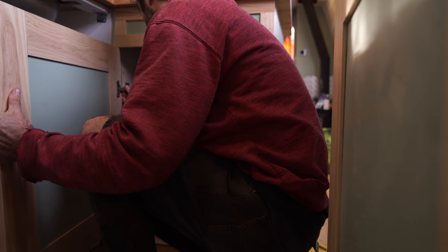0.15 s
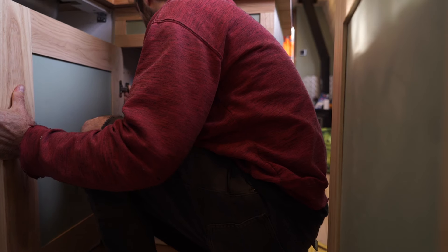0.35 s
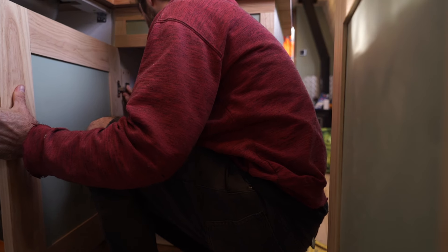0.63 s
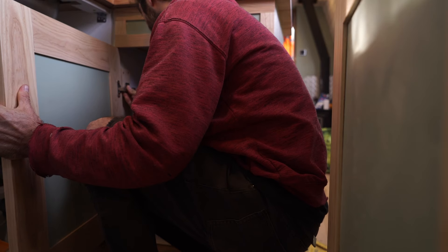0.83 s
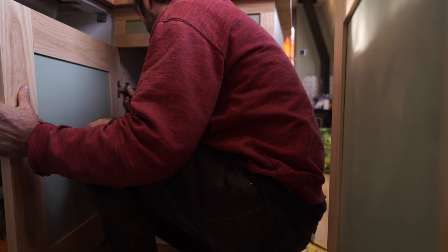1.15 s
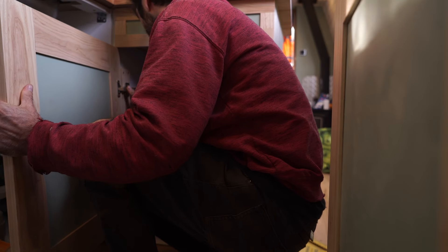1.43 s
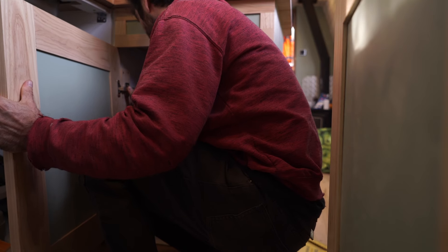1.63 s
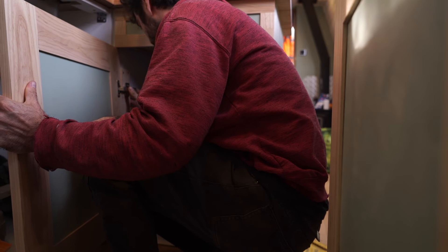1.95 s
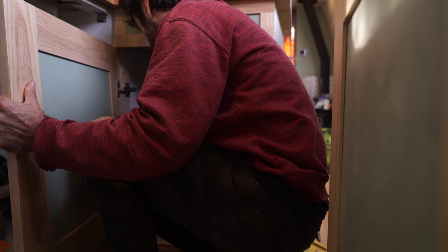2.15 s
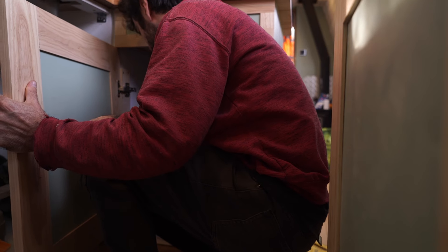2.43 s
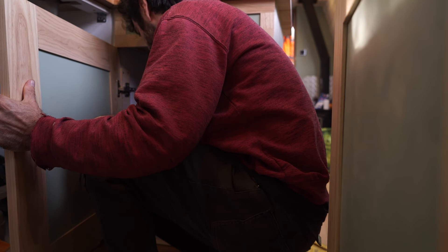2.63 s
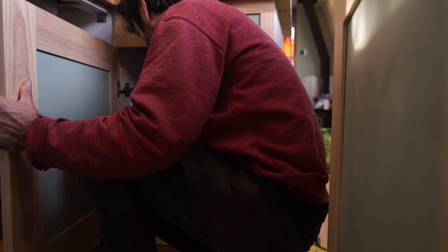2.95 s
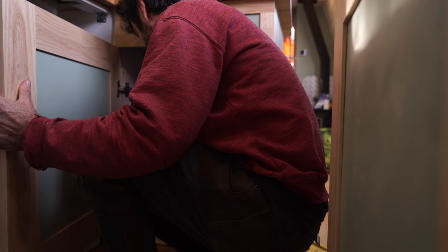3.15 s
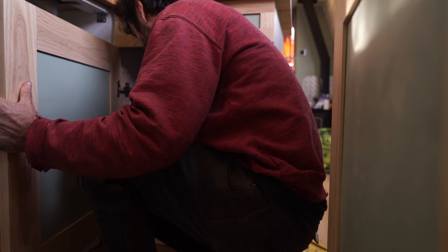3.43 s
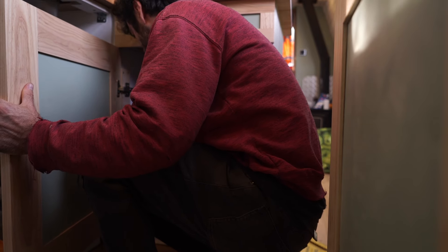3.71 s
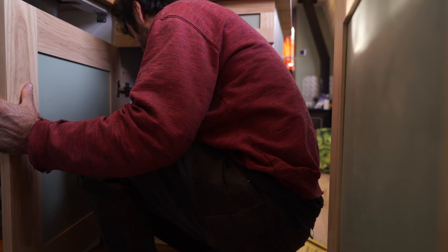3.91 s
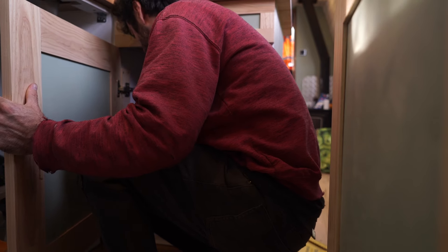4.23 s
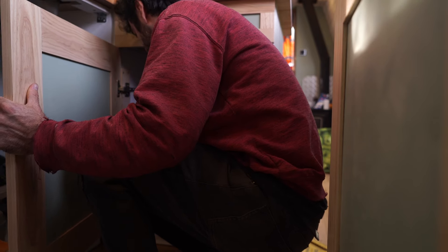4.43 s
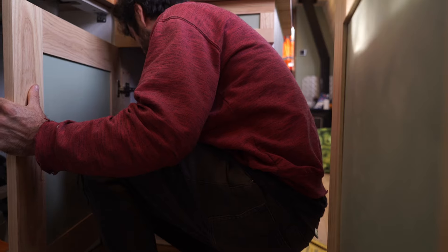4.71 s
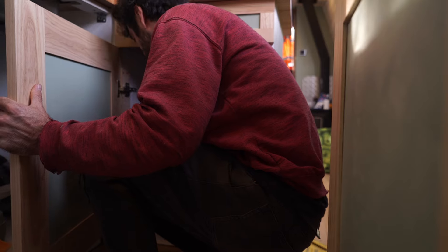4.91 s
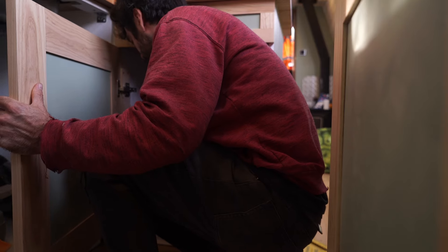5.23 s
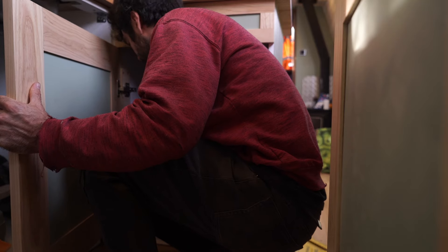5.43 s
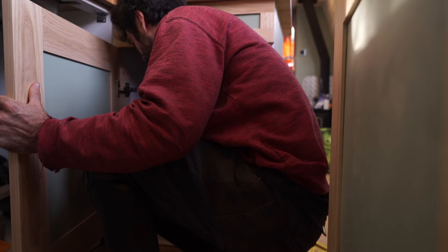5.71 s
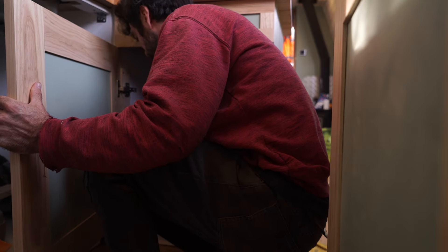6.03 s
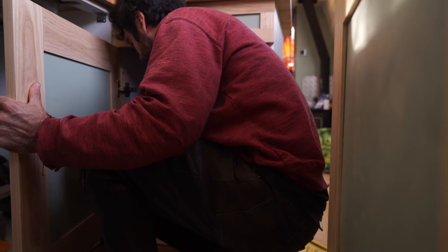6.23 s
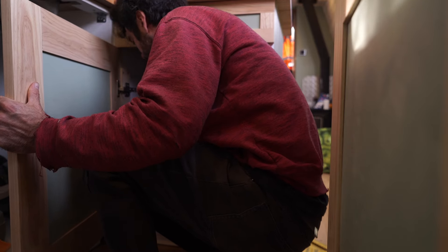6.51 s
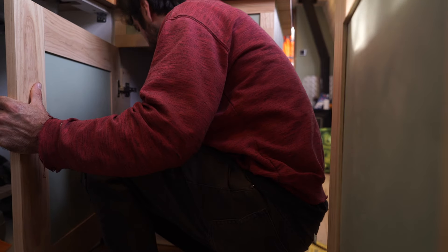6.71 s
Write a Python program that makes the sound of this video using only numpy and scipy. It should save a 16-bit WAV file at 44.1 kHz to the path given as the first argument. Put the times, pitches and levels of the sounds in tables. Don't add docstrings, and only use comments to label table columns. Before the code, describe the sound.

A wooden cabinet door bumps and knocks its frame in irregular bursts, with small metal hinge clicks, rattles and low panel thumps, close up.

```python
import sys
import numpy as np
from scipy import signal
from scipy.fft import rfft, irfft, next_fast_len
from scipy.io import wavfile
from scipy.ndimage import uniform_filter1d, map_coordinates

SR = 44100
rng = np.random.default_rng(int(sys.argv[2]) if len(sys.argv) > 2 else 0)


def transcribe(u):
    v = np.clip(np.atleast_2d(u).T, -1, 1)
    q = np.round(v * 32767).astype(np.int16)
    wavfile.write(sys.argv[1], SR, q)


def attenuation_scalar(level_db):
    decades = np.asarray(level_db, float) / 20
    return 10 ** decades


N = 302631


def unit(x):
    return x / np.sqrt(np.mean(x ** 2) + 1e-20)


def along(points, hz):
    f, v = np.transpose(points)
    return np.interp(np.log(hz + 1), np.log(f + 1), v, left=v[0], right=v[-1])


def curves(rows):
    s, *cols = np.transpose(rows)
    return [np.interp(np.arange(N) / SR, s, c) for c in cols]


def wobble(rate):
    knots = rng.standard_normal(int(N * rate / SR) + 4)
    return map_coordinates(knots, [np.arange(N) * rate / SR])


def noise(spectrum):
    m = next_fast_len(N + 8192)
    gain = attenuation_scalar(along(spectrum, np.fft.rfftfreq(m, 1 / SR)))
    return unit(irfft(rfft(rng.standard_normal(m)) * gain, m)[:N])


def causal(db):
    c = irfft(db * np.log(10) / 20)
    c[1:len(c) // 2] *= 2
    c[len(c) // 2 + 1:] = 0
    return np.exp(rfft(c))


def strokes(rows, t):
    return sum(attenuation_scalar(db) * np.exp(-(2 * (t - s) / length) ** 2) for s, length, db in rows)


def tail(size):
    # frequency in Hz, t60 in s.
    room_decay = [(100, 0.53), (400, 0.33), (1200, 0.3), (3000, 0.26), (8000, 0.33), (15000, 0.091)]
    hz, t, z = signal.stft(rng.standard_normal(size), SR, nperseg=256)
    decay = attenuation_scalar(-60 * t / along(room_decay, hz)[:, None])
    h = signal.istft(z * decay, SR, nperseg=256)[1][:size]
    h = h * (1 - np.exp(-np.arange(size) / SR / 0.0062))
    return h / np.linalg.norm(h)


def add(track, s, x, source, room_db):
    wet = attenuation_scalar(room_db) * signal.fftconvolve(source, tail(size=20480))
    wet[:len(x)] += x
    k = round(s * SR)
    track[k:k + len(wet)] += wet


def in_room(track):
    wet = attenuation_scalar(-14) * signal.fftconvolve(track, tail(size=20480))
    return (track + wet[:len(track)])[:N]


def hiss():
    # frequency in Hz, level in dB.
    floor_colour = [(18, -26), (30, 1.5), (86, 5), (268, -9), (332, -14.5), (519, -15.5), (676, -12.5),
                    (814, -16), (1120, -18.5), (2810, -34.5), (13000, -33.5), (15200, -42), (16500, -67)]
    return attenuation_scalar(-68) * noise(floor_colour)


def hands():
    # time in s, effort in dB.
    grip = [(0, -51.5), (.3, -103), (.5, -45), (.77, -60), (.93, -82), (1.36, -58.5), (1.5, -47.5),
            (2.1, -70.5), (2.45, -70), (2.65, -63), (2.89, -68.5), (3.2, -55), (3.89, -71.5), (4.31, -58),
            (4.45, -70.5), (5.1, -61), (5.7, -78.5), (6.45, -68.5)]
    # start in s, peak level in dB, t60 in s.
    shudders = [(0.351, -29.5, 0.41), (0.591, -33, 0.13), (1.575, -18.5, .17), (1.729, -29, 0.3),
                (2.581, -45.5, 0.22), (3.62, -34.5, 0.3), (5.36, -49.5, 0.66)]
    # middle in s, length in s, peak level in dB.
    palm_strokes = [
        (1.37, .08, -68),
        (4.08, 0.13, -67.5),
        (4.28, 0.13, -67.5),
        (3.128, .02, -56),
        (.308, .02, -60),
        (2.67, .04, -58),
    ]
    # middle in s, length in s, peak level in dB.
    sleeve_strokes = [(0.49, 0.13, -77.5), (1.42, 0.31, -74), (1.715, .12, -80), (2.103, 0.22, -83),
                      (2.13, 0.017, -60), (3.257, 0.0095, -75), (3.265, 0.14, -91), (4.08, 0.17, -79),
                      (4.28, 0.18, -77), (5.2, 1, -88.5), (6.4, 0.38, -78.5)]
    # frequency in Hz, level in dB (sway: dB per Hz).
    sway_colour = [(18, -41.5), (30, -5), (71, 0), (96, -5.5), (145, -3), (258, -11), (303, -5),
                   (367, -18.5), (411, -21), (450, -21), (580, -62), (990, -120)]
    rub_colour = [(300, -40), (500, 0), (1200, -2), (2500, -12), (5000, -35)]
    cloth_colour = [(800, -1), (2000, 10), (5000, 5), (10000, -5), (16000, -9)]

    t = np.arange(N) / SR
    (effort_db,) = curves(grip)
    shudder = np.zeros(N)
    for s, db, t60 in shudders:
        since = np.maximum(t - s, 0)
        shudder += attenuation_scalar(db - 60 * since / t60) * (1 - np.exp(-since / 0.0044))
    sway = (attenuation_scalar(effort_db) + shudder) * attenuation_scalar(3 * wobble(15)) * noise(sway_colour)
    palms = attenuation_scalar(-37.5 + 0.65 * effort_db)
    palms = palms + attenuation_scalar(-24.5) * shudder + strokes(palm_strokes, t)
    rub = palms * attenuation_scalar(3 * wobble(30)) * noise(rub_colour)
    sleeves = attenuation_scalar(-83.5) + strokes(sleeve_strokes, t)
    cloth = sleeves * attenuation_scalar(-4.0 + 3.1 * wobble(65)) * noise(cloth_colour)
    return sway + rub + cloth


def end_noise():
    # time in s, level in dB.
    end_level = [
        (6.796, -41.5),
        (6.86, -42.5),
    ]
    # frequency in Hz, level in dB.
    grit_colour = [(29, -48), (50, -7.5), (101, 2.5), (204, 1.5), (324, 2.5), (580, -12.5), (757, -6.5),
                   (1230, -9.5), (1360, -11), (2000, -16), (5100, -24), (5400, -11.5), (5700, -20.5),
                   (15000, -32), (16500, -36.5)]
    start = np.arange(N) / SR > end_level[0][0]
    grit_db = 2 * wobble(250)
    return start * attenuation_scalar(curves(end_level)[0] + grit_db) * noise(grit_colour)


def squeaks():
    # middle in s, length in s, peak level in dB, pitch in Hz, glide in Hz per s.
    pin_squeaks = [
        (1.1, .05, -76, 1141, 0),
        (1.160, .05, -82, 1700, 0),
        (1.18, .04, -81, 2530, 0),
        (1.289, .012, -75, 4150, -4000),
        (1.304, .01, -76, 3880, -4000),
        (1.329, .012, -76, 3880, -1500),
        (1.345, .03, -84, 5600, -9000),
        (1.360, .04, -72, 1178, 0),
        (1.365, .04, -74, 1469, 0),
        (1.35, .05, -75, 1820, 0),
    ]
    track, t = np.zeros(N + SR), np.arange(SR // 4) / SR
    u, waver = t - t.mean(), wobble(150)
    for s, length, db, hz, glide in pin_squeaks:
        k = round((s - t.mean()) * SR)
        phase = 2 * np.pi * (hz + glide * u / 2) * u + 1.2 * waver[k:k + len(t)]
        track[k:k + len(t)] += strokes([(0.00056, length, db)], u) * np.sin(phase)
    return in_room(track)


def rings():
    # start in s, peak level in dB, mode in Hz, t60 in s.
    damped_rings = [(.330, -38.5, 1157, .09), (.333, -38, 690, .07), (.3680, -33, 1150, 0.12),
                    (.3686, -35, 1340, .06), (.372, -37, 740, .1), (.5050, -35, 900, 0.075),
                    (.509, -34, 1265, .03), (.655, -52, 902, .06), (1.198, -60, 610, .03),
                    (1.229, -60.5, 603, .03), (1.261, -60, 612, .03), (1.474, -52, 1870, .03),
                    (1.5430, -24, 310.6, 0.14), (1.5436, -28, 880, 0.057), (1.624, -38, 290, 0.071),
                    (1.7220, -32, 175, 0.089), (1.7226, -33.5, 345, 0.071), (1.727, -42, 495, 0.074),
                    (1.765, -38, 300, 0.096), (2.019, -40, 200, .07), (2.127, -54, 1350, .03),
                    (2.522, -37, 794, 0.045), (2.557, -48, 692, .12), (2.652, -48, 620, .06),
                    (2.987, -50, 1050, .04), (3.442, -44, 1450, .04), (3.647, -36, 880, 0.029),
                    (3.648, -47, 2110, .02), (3.657, -44, 1500, .02), (3.641, -66, 5800, .015),
                    (3.656, -64, 5600, .012), (3.771, -56, 1100, .02), (4.663, -60, 1550, .02),
                    (4.826, -61.5, 1400, .03), (5.005, -35.5, 301.3, .15), (5.012, -38.5, 861, 0.085),
                    (5.10, -44, 201, 0.16), (5.346, -66, 5200, 0.0091), (5.347, -52, 2900, .02),
                    (5.368, -59.5, 5100, 0.014), (5.370, -62, 6000, .012), (5.376, -60, 3700, .015),
                    (6.3430, -30, 822, .05), (6.3436, -32, 3120, 0.032), (6.344, -28, 2100, .03),
                    (6.356, -35.5, 807, .1), (6.352, -38.5, 1042, .11), (6.354, -42.5, 1324, 0.18),
                    (6.355, -42, 1920, .2), (6.353, -42, 2306, .2),
                    (.0005, -52, 150, .1), (.002, -58, 750, .06), (.3165, -42, 1700, .015),
                    (.3170, -46, 2600, .012), (.6518, -50, 2600, .02), (.6522, -52, 1900, .02),
                    (.657, -54, 560, .06), (1.3888, -58, 5600, .003), (1.3890, -60, 3000, .004),
                    (1.4262, -52, 4300, .006), (1.529, -34, 560, .05), (1.548, -28, 580, .06),
                    (1.5475, -28, 1500, .03), (2.005, -52, 430, .05), (2.126, -64, 11000, .02),
                    (2.128, -62, 6800, .02), (2.992, -48, 150, .12), (3.439, -38, 230, .07),
                    (3.452, -34, 90, .07), (3.468, -42, 320, .06), (3.441, -48, 560, .05),
                    (3.569, -54, 700, .03), (4.677, -42, 270, .05), (4.680, -50, 480, .04),
                    (4.828, -58, 380, .06), (5.13, -50, 190, .15), (5.321, -40, 200, .08),
                    (5.322, -50, 2500, .015), (6.345, -38, 3900, .02), (6.351, -46, 2692, .15)]
    track, t = np.zeros(N + SR), np.arange(SR // 4) / SR
    for s, db, hz, t60 in damped_rings:
        mode = attenuation_scalar(db - 60 * t / t60) * np.sin(2 * np.pi * hz * t)
        track[round(s * SR):][:len(t)] += mode * (1 - np.exp(-t / .0012))
    return in_room(track)


def ticks():
    # start in s, peak level in dB, mode in Hz, t60 in
    # s.
    quick_modes = [(.147, -56, 8650, 0.0026), (.606, -59, 5630, 0.0066), (1.2422, -54, 2450, 0.017),
                   (1.2426, -61, 4000, 0.013), (1.223, -68, 2400, 0.01), (1.173, -63, 570, 0.03),
                   (1.408, -56, 1900, 0.03), (1.426, -41, 3257, 0.011), (1.440, -43, 3150, 0.016),
                   (3.569, -39, 9160, 0.0018), (3.5698, -51, 7800, 0.0042), (3.5702, -59, 11400, 0.0032),
                   (1.3892, -48, 4900, 0.0026), (1.3894, -56, 6500, .003), (1.426, -50.5, 5000, 0.0037),
                   (.370, -29.5, 1620, 0.048), (.506, -32, 750, 0.088), (1.5462, -11, 1930, 0.0088),
                   (2.124, -62, 5400, 0.03), (2.131, -55, 993, 0.05), (2.526, -44, 570, 0.075),
                   (2.524, -34.5, 1413, .05), (5.0025, -19, 792, 0.024), (5.323, -31.5, 774, 0.037),
                   (6.347, -20, 1640, 0.035), (6.3425, -31, 6350, 0.018), (4.300, -72, 6700, 0.026),
                   (5.373, -61.5, 7900, 0.011), (6.722, -63, 9700, 0.0071), (6.725, -57.5, 8730, 0.011),
                   (.331, -44, 455, .06), (.373, -36, 385, 0.06), (0.5048, -26.5, 2320, 0.013),
                   (1.5023, -34, 1720, .012), (1.53, -24.5, 2420, 0.014), (1.5466, -22, 2520, 0.012),
                   (1.552, -29.5, 424, 0.098), (1.553, -31.5, 493.5, 0.1), (1.737, -33, 344, 0.089),
                   (2.576, -48, 745, 0.064), (2.988, -52, 404, 0.064), (3.442, -45.5, 416, .07),
                   (5.003, -34.5, 1170, 0.043), (5.0034, -37, 1836, 0.032), (5.331, -41, 238, 0.1),
                   (6.3442, -41, 255, 0.072), (6.346, -30, 2630, 0.043), (6.732, -54.5, 415, 0.018)]
    track, t = np.zeros(N + SR), np.arange(SR // 10) / SR
    for s, db, hz, t60 in quick_modes:
        mode = attenuation_scalar(db - 60 * t / t60) * np.sin(2 * np.pi * hz * t)
        x = mode * (1 - np.exp(-t / .0003))
        add(track, s, x, x, room_db=-21.0)
    return track[:N]


def contacts(rows, rise, t60, crack_db, lift_db, room_db):
    # centre in Hz, width in Hz, level in dB.
    wood_modes = [(544, 37, -14), (690, 90, -5.5), (753, 50, -8), (865, 35, -8), (1038, 30, -14),
                  (1161, 40, -8), (1340, 34, -11), (1480, 30, -13), (1577, 30, -15), (1620, 20, -14.5),
                  (1900, 40, -15), (2155, 30, -16), (2690, 88, -16), (3200, 110, -19.5)]
    track, size = np.zeros(N + SR), 8192
    t, f = np.arange(size) / SR, np.fft.rfftfreq(size, 1 / SR)
    body = sum(attenuation_scalar(db) / (1 + (2 * (f - c) / w) ** 2) for c, w, db in wood_modes)
    body_db = .8 * 20 * np.log10(body + .2)
    dull = causal(along([(2500, -2.0), (5000, -8), (12000, -20)], f))
    band = (f > 1000) & (f < 2000)
    for s, db, wood_db, metal_db in rows:
        edge_db = lift_db + 0.61 * metal_db
        swell = attenuation_scalar(-60 * t / max(t60, .003)) * (1 - np.exp(-t / rise)) ** 2 * (t < .14)
        crack = attenuation_scalar(crack_db - 60 * t / 0.012) * (1 - np.exp(-t / .00015))
        grains = attenuation_scalar(4 * np.repeat(rng.standard_normal(size // 64), 64))
        rattle = rfft(swell * grains * rng.standard_normal(size)) * dull
        force = rattle + rfft(crack * rng.standard_normal(size))
        even = causal(-10 * np.log10(uniform_filter1d(np.abs(force) ** 2, size=48)))
        tone = [(150, wood_db - 30.0), (400, wood_db - 0), (600, wood_db - 1.0), (900, wood_db),
                (1200, 0.012), (1800, 0.0068), (2750, edge_db - 4.0), (3300, edge_db - 8.0),
                (4500, metal_db + 5.0), (7000, metal_db - 2.5), (16000, metal_db - 17.0)]
        colour = causal(body_db + along(tone, f))
        z = force * even * colour
        x = irfft(z) * attenuation_scalar(db) / np.abs(irfft(z * band)).max()
        pulse = np.roll(irfft(colour * dull ** 0.5), np.argmax(swell))
        add(track, s, x, pulse * np.linalg.norm(x) / np.linalg.norm(pulse), room_db)
    return track[:N]


def scuffs():
    # start in s, peak level in dB, wood in dB, metal in dB.
    slides = [(.286, -62, 8, -23.5), (1.1494, -73, -7, -19), (1.1994, -73.5, 16.5, -15),
              (1.4069, -50.5, 4, -12), (1.475, -63, 19, -3), (1.9909, -58.5, 5.5, -35),
              (2.122, -58, -15, -12), (2.3694, -67.5, -6, -14.5), (2.764, -64, 11, -23),
              (3.094, -57, 0.5, -36), (3.120, -55, 0, -36), (3.172, -66, 10, -34), (3.2425, -62, 3, -24),
              (3.2714, -57.5, 3.5, -26), (3.6114, -55, 12.5, -19), (3.9275, -65.5, 4.5, -27.5),
              (4.2438, -62, 8, -26), (4.2954, -55.5, 7, -16.5), (4.6744, -61.5, 9.5, -24.5),
              (4.9474, -57.5, 2.5, -27.5), (5.3048, -58, 9, -27), (5.3174, -39, 4.5, -53),
              (5.8376, -65.5, 1, -18), (5.891, -63.5, 0, -22), (6.5999, -62.5, 4.5, -30)]
    return contacts(slides, rise=0.0072, t60=0.073, crack_db=-41.5, lift_db=3.5, room_db=-10)


def rattles():
    # start in s, peak level in dB, wood in dB, metal in dB.
    chatter = [(.316, -34, -4, -30), (1.2424, -68.5, 13, -23), (1.4254, -52, -27, -16),
               (1.724, -42, 9, -36), (2.519, -35.5, 0, -22), (3.5853, -51.5, 6.5, -33),
               (3.647, -42.5, 4.5, -33.5), (3.7203, -56, 0, -43), (4.8271, -66, 6, -19),
               (5.3154, -49, 3, -20), (.296, -48, 5, -38.5)]
    return contacts(chatter, rise=.002, t60=.075, crack_db=-6, lift_db=7.5, room_db=-8.5)


def clicks():
    # start in s, peak level in dB, wood in dB, metal in dB.
    snaps = [(.0044, -48.5, 2.5, -25), (.3476, -32.5, 1, -30), (.3682, -23, -7, -30),
             (.5048, -26.5, -6, -24.5), (1.3884, -56, -10.5, -16), (1.4394, -57, 0, -22),
             (1.5657, -35.5, 10, -31.5), (2.649, -45, 1.5, -28), (2.9845, -44.5, 1, -27),
             (3.3707, -62.5, -4, -17.5), (3.6254, -47.5, 9.5, -27), (3.6404, -40, 4, -31),
             (3.6554, -44.5, 4.5, -43), (4.4129, -53, -0.5, -50), (4.6633, -60, 6, -22),
             (4.9996, -28.5, -3, -22), (5.3694, -53.5, 13.5, -21.5), (5.4081, -57, 11.5, -27),
             (6.7243, -66, -15.5, -9), (6.7321, -63, 5.5, -8.5)]
    return contacts(snaps, rise=.002, t60=.035, crack_db=-5, lift_db=6.5, room_db=-10.5)


def knocks():
    # start in s, peak level in dB, wood in dB, metal in dB.
    edge_hits = [(.3324, -30, -2.5, -32.5), (.3845, -23.5, -4, -17.5), (.4753, -36, -0.5, -26),
                 (.526, -36, 5, -29), (.6515, -41.5, -7.5, -42), (1.501, -28.5, -4, -23.5),
                 (1.5267, -23, 0, -32.5), (1.5445, -16.5, -5, -39), (1.7444, -36, 0, -34),
                 (3.4375, -39, -1, -35), (5.3484, -42.5, 8, -27), (6.3425, -18, -8, -20.5)]
    return contacts(edge_hits, rise=0.0012, t60=0.027, crack_db=-3.5, lift_db=12, room_db=-10.5)


def thumps(rows, rail_db, pane_db):
    rail_hz, pane_hz = 218.2, 297.3
    track, t = np.zeros(N + SR), np.arange(SR // 3) / SR
    for s, db, hz, t60 in rows:
        detune = 1 + rng.standard_normal(2) * [.1, .008]
        choke_db = -60 * (t / max(t60, .02)) ** 1.4
        panel = attenuation_scalar(3.5 + choke_db) * np.sin(2 * np.pi * hz * t)
        rail = attenuation_scalar(rail_db + 2.2 * choke_db) * np.sin(2 * np.pi * rail_hz * detune[0] * t)
        pane = attenuation_scalar(pane_db + 1.11 * choke_db) * np.sin(2 * np.pi * pane_hz * detune[1] * t)
        padded = (1 - np.exp(-t / 0.0033)) ** 2
        x = attenuation_scalar(db) * padded * (panel + rail + pane)
        add(track, s, x, x, room_db=-17)
    return track[:N]


def door():
    # start in s, peak level in dB, panel in Hz, t60 in s.
    flat_blows = [(.43, -44, 95.3, 0.41), (.499, -56, 88.5, .17), (.54, -42, 95, 0.093),
                  (1.25, -62, 106, 0.18), (1.547, -9.5, 90.8, 0.1), (1.627, -38, 91.5, 0.43),
                  (1.689, -53, 102, 0.1), (1.737, -15, 96.2, 0.069), (2.077, -45, 122, 0.17),
                  (2.419, -52.5, 99.6, 0.37), (2.559, -32, 99.7, 0.12), (2.784, -49, 95.6, 0.15),
                  (3.1, -58.5, 86.6, 0.97), (3.229, -43, 105.4, 0.13), (3.488, -36, 106, 0.13),
                  (3.589, -38, 77, 0.16), (3.646, -19, 90, 0.13), (3.679, -23, 98.7, .07),
                  (3.719, -35, 105.5, 0.13), (4.674, -32, 107.4, 0.06), (4.690, -40, 108.7, 0.051),
                  (4.758, -44, 115, .09), (5.359, -26.5, 107.7, 0.13), (5.436, -36, 100, 0.08),
                  (5.2, -47.5, 118, 0.083), (5.08, -41.5, 98.6, 0.11), (6.53, -65.5, 113.1, 0.37)]
    corner_bumps = [(1.724, -35.5, 138.5, 0.34), (2.003, -38, 89.8, .12), (2.98, -41.5, 83, 0.092),
                    (3.474, -42, 100, 0.088), (4.296, -54.5, 110.7, 0.23), (4.408, -56.5, 103.5, 0.23),
                    (5.006, -35.5, 82, 0.19), (5.028, -28.5, 100, 0.061), (5.328, -35, 114, 0.28),
                    (5.383, -24.5, 92.5, 0.062), (6.338, -40.5, 130, 0.19), (6.378, -35, 107.3, 0.061),
                    (6.731, -62.5, 84.5, 0.13)]
    pane_jolts = [
        (.009, -52.5, 110, 0.084),
        (.17, -61, 111, 0.092),
        (.317, -36.5, 104.8, 0.43),
        (.368, -30, 139, 0.17),
        (.657, -47.5, 113.3, 0.11),
        (.865, -66.5, 119, 0.22),
        (1.41, -47, 63, 0.28),
        (1.509, -32, 87, 0.26),
    ]
    hand_stops = [
        (.587, -21, 90, .1),
        (3.438, -27, 83, .075),
        (4.706, -28, 108, .08),
    ]
    return (thumps(flat_blows, rail_db=-9.5, pane_db=-16.5)
            + thumps(corner_bumps, rail_db=1.5, pane_db=-4.5)
            + thumps(pane_jolts, rail_db=-12.5, pane_db=6.5)
            + thumps(hand_stops, rail_db=-20, pane_db=-25))


def scene():
    background = hiss() + hands() + end_noise()
    hinge = squeaks() + ticks() + scuffs() + rattles() + clicks()
    wood = rings() + knocks() + door()
    return (background + hinge + wood)[None]


def roll_off(x):
    return signal.sosfilt(signal.butter(12, 15850, fs=SR, output="sos"), x)


def record(dry):
    low_cut = signal.butter(3, 45, "highpass", fs=SR, output="sos")
    return roll_off(signal.sosfilt(low_cut, dry))


dry = scene()
out = record(dry)
transcribe(out)
```